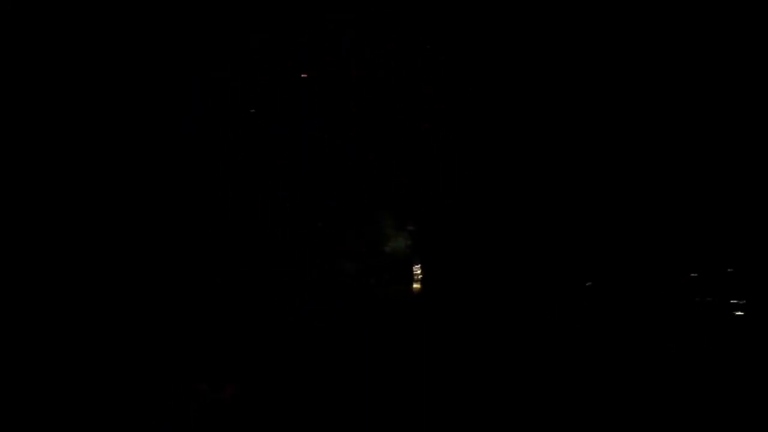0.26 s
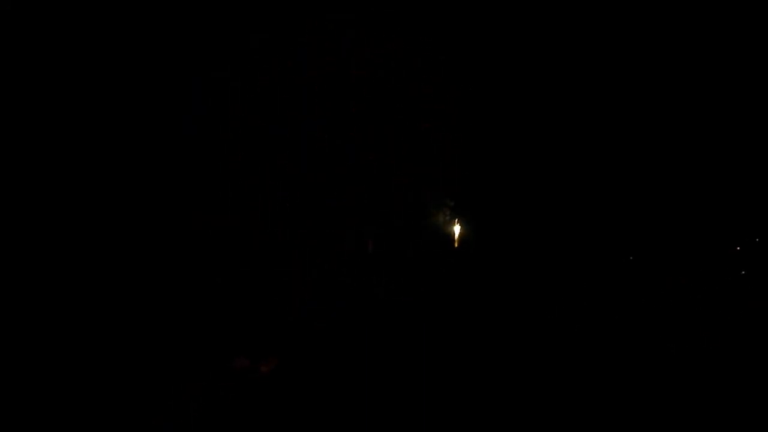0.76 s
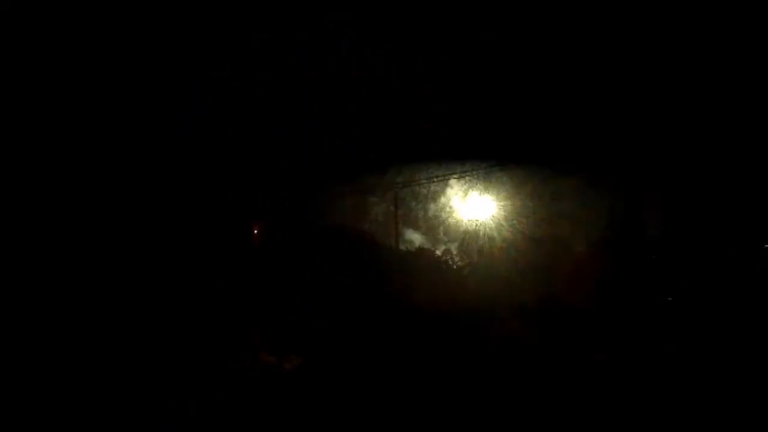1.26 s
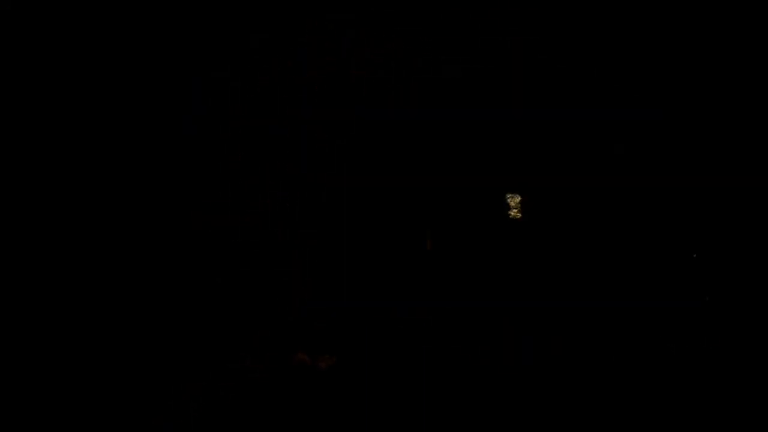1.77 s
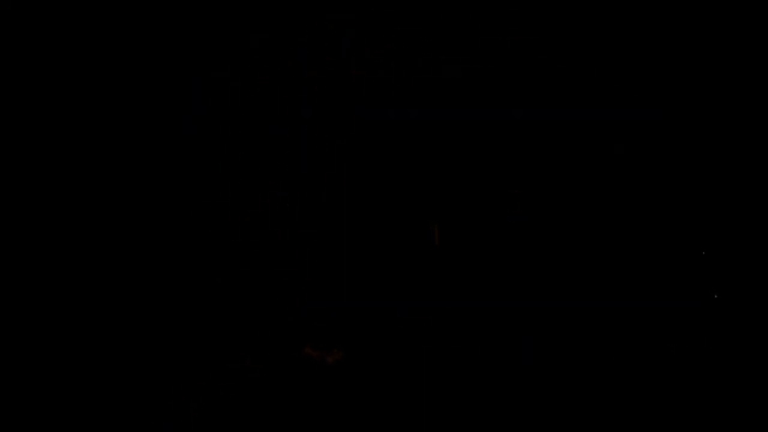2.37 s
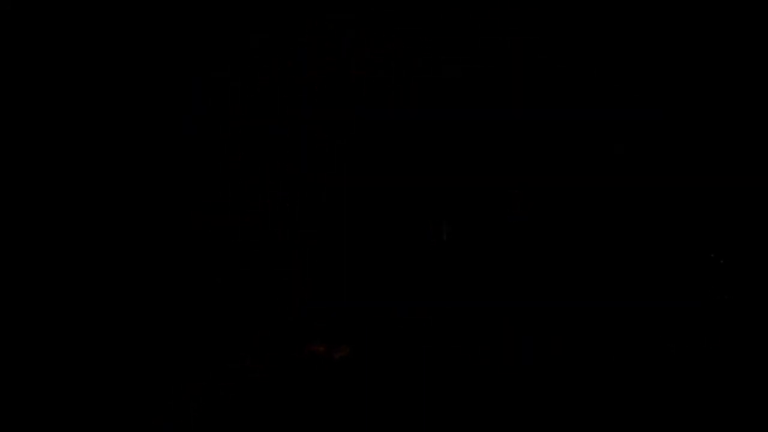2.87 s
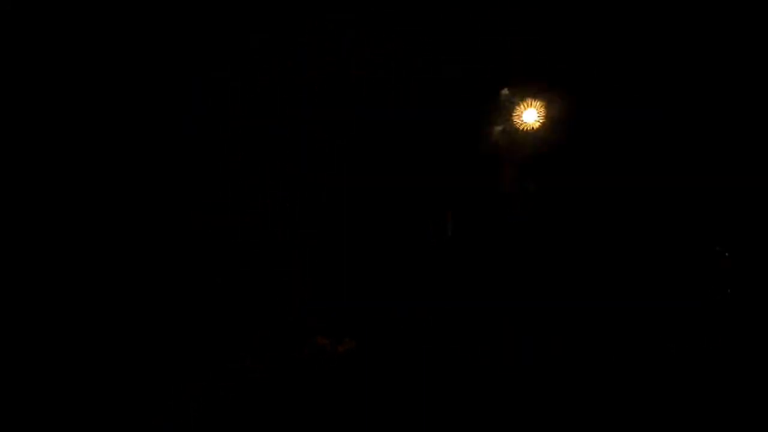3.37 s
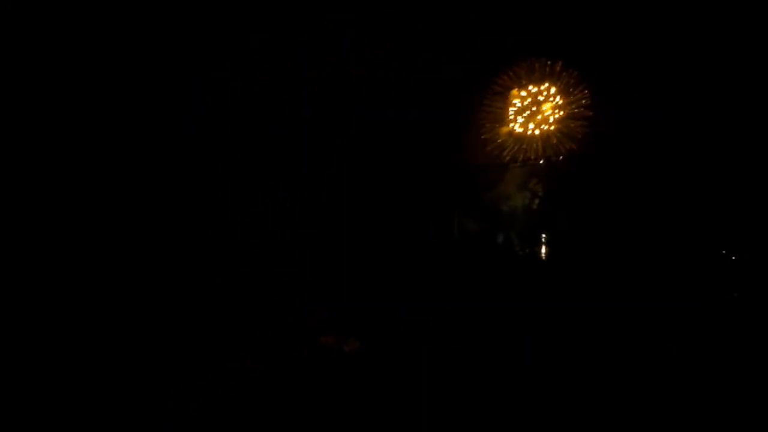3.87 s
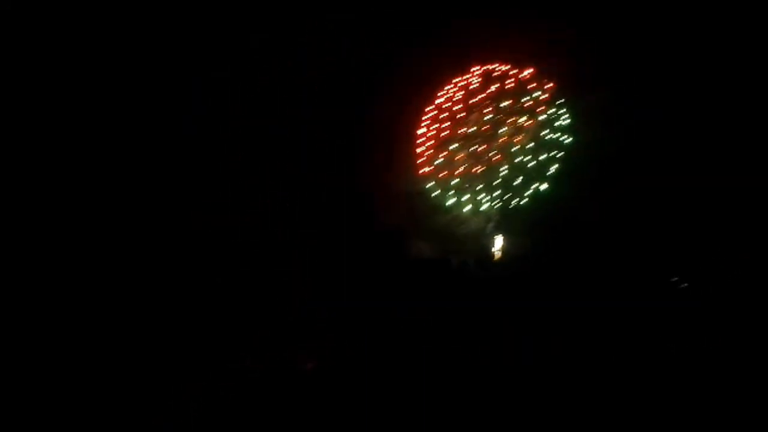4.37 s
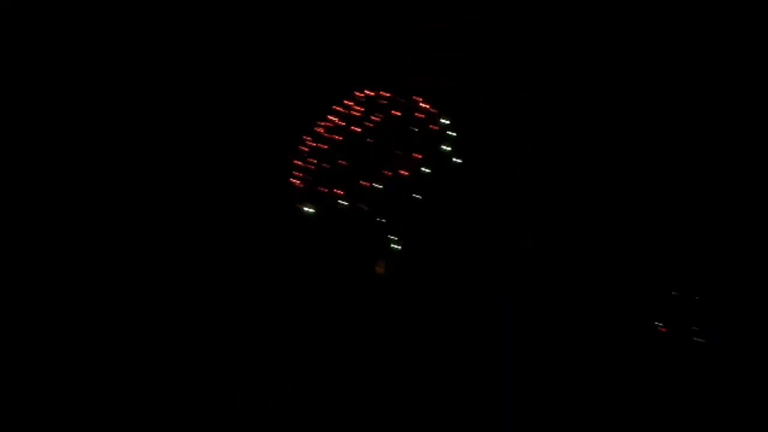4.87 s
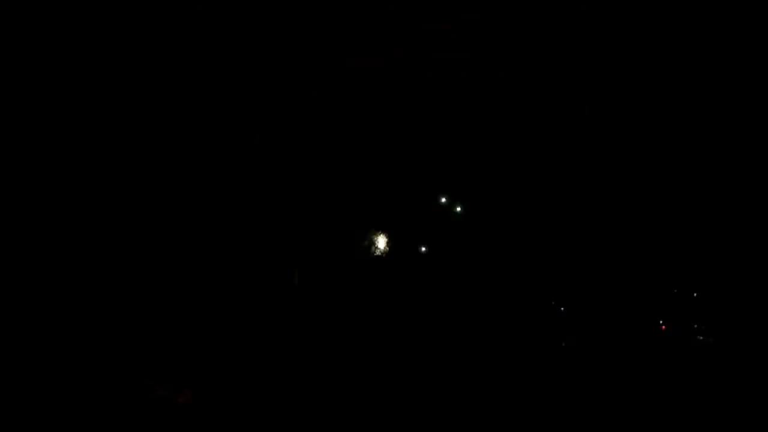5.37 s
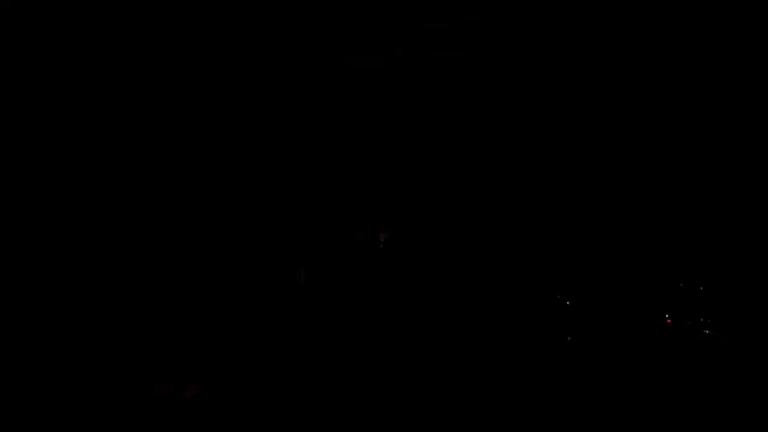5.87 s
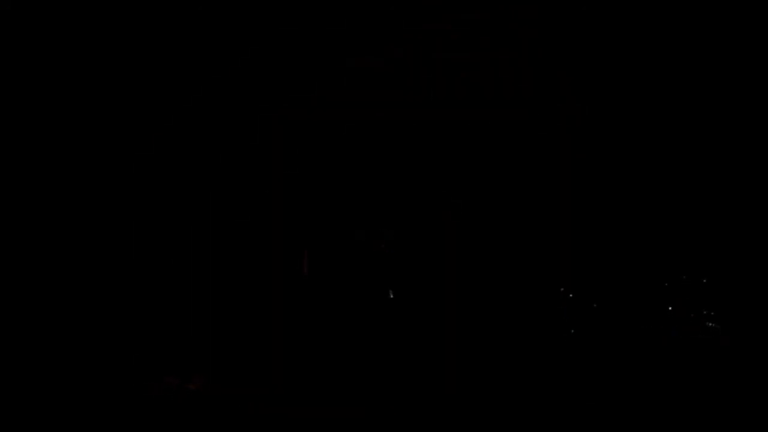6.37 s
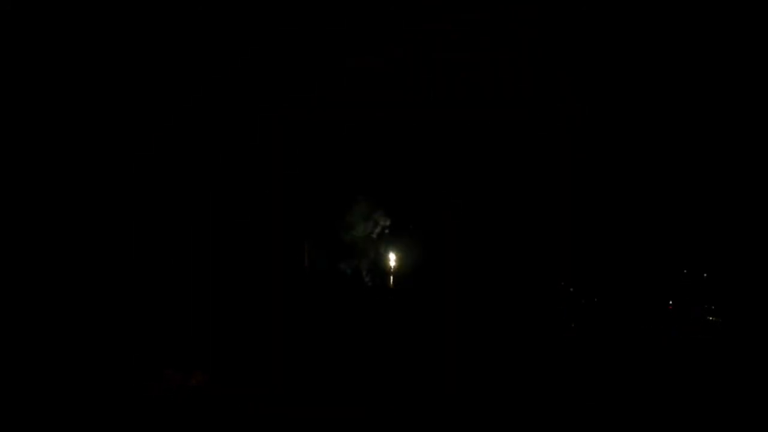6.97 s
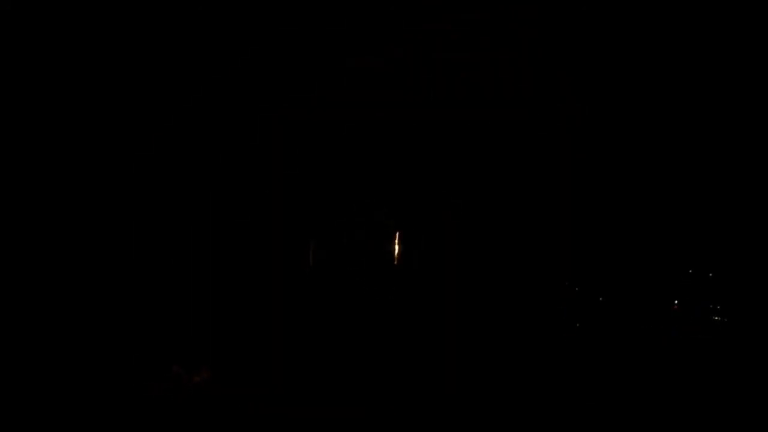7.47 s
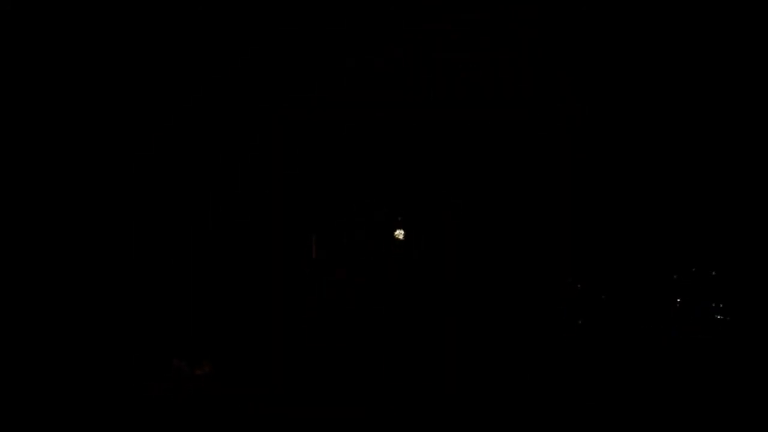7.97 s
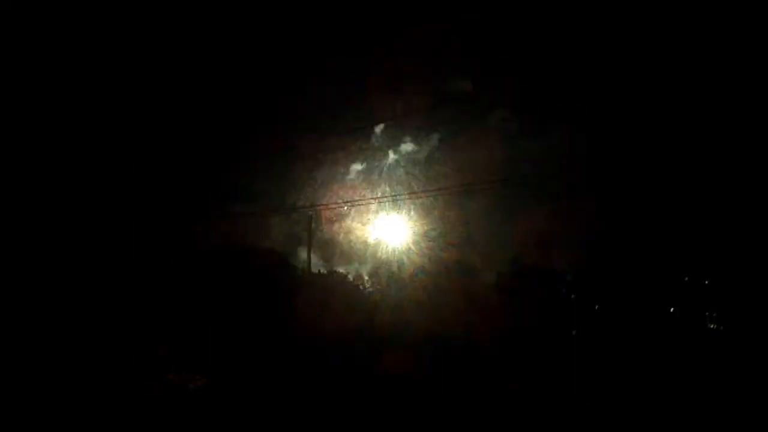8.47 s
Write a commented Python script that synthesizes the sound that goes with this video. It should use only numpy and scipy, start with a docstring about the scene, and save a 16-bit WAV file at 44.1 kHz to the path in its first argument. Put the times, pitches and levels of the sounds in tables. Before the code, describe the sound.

A faint roll of firework echoes hangs over a town at night, with very faint hiss at the microphone. At about 1.3 seconds one shell cracks sharply nearby, followed by a quick string of dull distant pops until about 2.1 seconds. From 3.1 to 3.6 seconds a rapid salvo of close bangs bursts, each with a brief fizz of sparks, slapping off walls and scattering through the streets. Another cluster of muffled far pops patters from 4.3 to 4.6 seconds under the rolling echo. A second close salvo runs from 6 to 6.7 seconds, with three small ticks right at the microphone between 6 and 6.4 seconds. One softer, duller thud follows at 7.2 seconds. The long low roll of echoes then fades across the town until the end, near 8.7 seconds.

```python
"""A faint roll of echoes hangs over a town at night, then a firework shell cracks close by. Near salvos
and dull far pops follow, each a pressure jump with a fizz of sparks, and each feeds the long roll.
Every blast reaches the microphone's two ports straight, off the ground and off nearby walls; the
streets scatter it further. Faint hiss and three small ticks sit right at the microphone.
The recorder subtracts each port, delayed, from the other to aim left and right."""
import sys
import numpy as np
from scipy import signal
from scipy.fft import rfft, irfft
from scipy.io import wavfile
from scipy.ndimage import uniform_filter1d

SR = 44100
rng = np.random.default_rng(int(sys.argv[2]) if len(sys.argv) > 2 else 0)


def wav_record(signal):
    """Record a signal, one row per channel, as 16-bit PCM in the file named by sys.argv[1]."""
    frames = np.transpose(np.atleast_2d(signal))
    bounded = np.clip(frames, -1, 1)
    # unit amplitude maps onto the largest positive 16-bit level
    quanta = np.round(bounded * 32767).astype(np.int16)
    wavfile.write(sys.argv[1], SR, quanta)


N = 384111

# Hiss around the microphone. Each row: time in seconds, level in dB.
HISS_DRIFT = [(0, -106), (1.4, -105.5), (2.9, -103.5), (3.7, -107.5), (5.2, -104.5), (5.95, -103.5),
              (6.8, -107.5), (8.71, -106.5)]
# Its colour. Each row: frequency in Hz, gain in dB.
HISS_SPECTRUM = [(500, 2.5), (3000, 5), (6000, -0.5), (8000, 3.5), (11000, 1.5), (13500, 3), (14900, -2),
                 (15300, -24), (17000, -33.5)]
# Ticks at the microphone. Each row: start in seconds, level in dB, pitch in Hz, knock gain in dB.
CLOSE_TICKS = [(6.001, -41, 9100, -8), (6.349, -40, 9100, -30), (6.37, -26, 9300, -29)]
# Echoes rolling back from far off. Each row: frequency in Hz, gain in dB.
ROLL_SPECTRUM = [(30, -46), (60, -40), (110, -4), (200, 1), (300, -3), (420, -13.5), (520, -12.5),
                 (640, -8), (800, -14.5), (1000, -19.5), (1400, -24), (2000, -25), (3000, -34),
                 (5000, -55.5), (9000, -63)]
# Their decay. Each row: frequency in Hz, seconds to fall 60 dB.
ROLL_DECAY = [(110, 5.4), (230, 5.3), (650, 6.5), (1200, 5.9), (2000, 5), (4000, 4)]
# The roll still in the air from an earlier salvo. Each row: frequency in Hz, level in dB.
OPENING_ROLL = [(110, -52), (200, -47), (650, -48), (2000, -47.3)]
# A quick and a slow swell of the roll, for near and for far shells. Each row: level in dB, dB gained
# per dB of shell level, build-up in seconds, decay time factor, treble and bass lift in dB per octave.
NEAR_SWELLS = [(-52.3, .3, .13, .39, .3, .8), (-49.3, 1, .45, 1, 1.3, .2)]
FAR_SWELLS = [(-32.5, 1, .015, .11, -2, 3), (-35, 1, 1.8, 1.7, 1.6, .2)]
# Sound scattered off the streets. Each row: frequency in Hz, gain in dB.
STREET_SPECTRUM = [(60, -8.5), (200, -4.5), (600, -13), (2000, -13.5), (5000, -11.5), (12000, -9.5)]
# Its decay. Each row: frequency in Hz, seconds to fall 60 dB.
STREET_DECAY = [(100, 1), (300, 0.48), (1000, 0.65), (3000, 0.6945), (8000, 0.69), (14000, 0.01)]
# Its treble comes mostly from further walls. Each row: frequency in Hz, build-up in seconds.
STREET_BUILD_UP = [(200, 0.013), (1000, 0.011), (3000, 0.027), (6000, 0.04), (10000, 0.07)]
# Treble flashes off the nearest rough walls. Each row: delay in seconds, strength, width in seconds.
WALL_FLASHES = [(0.011, 0.62, 0.0015), (0.0146, 3, 0.0022), (.0295, .9, .002)]
# Echo paths off the ground and off walls. Each row: delay in ms, gain in dB, signed factor,
# first port's lead in ms, extra loss at 10 kHz in dB.
GROUND_PATHS = [(1.5, -6.5, 0.73, 0.017, 43), (3.0, -7, 0.61, 0.017, 54.5), (5, -14.5, 1, 0.025, 31)]
WALL_PATHS = [(11.33, -10.5, -0.85, 0.022, 13), (14.89, -14.5, -0.91, -0.055, 5.4),
              (15.82, -21, 0.49, -0.077, 3), (28.58, -16, 0.94, -0.036, 11), (30.28, -13, -1.4, 0.12, 70),
              (30.85, -2, 0.94, 0.021, 310), (33.72, -3, -0.97, -.1, 390)]
# Distant shells. Each row: start in seconds, level in dB.
FAR_SHELLS = [(1.391, -47), (1.422, -38), (1.445, -40), (1.469, -37.5), (1.507, -37), (1.556, -37.5),
              (1.586, -39.5), (1.627, -47), (1.672, -34.5), (1.723, -36.5), (2.084, -43), (4.26, -39),
              (4.294, -37), (4.348, -39), (4.38, -36), (4.418, -36.5), (4.453, -38.5), (4.483, -47),
              (4.506, -37), (4.549, -35), (4.592, -37.5), (4.626, -39.5)]
# The blast they all share: the last five columns of NEAR_SHELLS.
FAR_SHAPE = (175, .3, -10, -56, -18)
# Shells close by. Each row: start in seconds, level in dB, air loss at 10 kHz in dB, jump length in ms,
# then gains in dB for ground bounce, spark fizz and low push.
NEAR_SHELLS = [(1.285, -7.5, 19, .49, -4.5, -23.5, -5), (3.08, -8.5, 25.5, .47, -5, -38, -11.5),
               (3.128, -13, 26, .88, 6, -30, -10), (3.298, -12.5, 18, .73, 10, -24.5, -7),
               (3.333, -13, 27, .54, 3, -30, -10), (3.37, -17.5, 23, .66, 6.5, -30, -7),
               (3.427, -16, 13, .56, 0, -23.5, -6.5), (3.473, -16.5, 29, .53, -.5, -34, -6),
               (3.551, -17.5, 20, .72, 2, -31, -4), (3.601, -16, 20.5, .69, 3, -27, -5),
               (6.043, -11, 33, .67, -2, -46, -12), (6.313, -12, 20.5, .78, 2, -26.5, -8.5),
               (6.404, -12.5, 13, .69, 1.5, -26, -6), (6.545, -11, 17, .66, -.5, -33, -12.5),
               (6.592, -9, 19, .69, 1.5, -19, -12.5), (6.623, -17.5, 15, .81, 4, -20, -9),
               (6.712, -17, 22, .73, 7, -32, -13.5), (6.738, -12, 16, .73, -3, -23.5, -8),
               (7.175, -27.5, 110, .48, 3, -60, -3)]
# How alike scattered sound is at the two ports. Each row: frequency in Hz, correlation.
PORT_LIKENESS = [(60, 1), (300, 0.99), (1000, 0.63), (2000, 0.1), (4000, .05)]
# The microphone's response to the bangs. Each row: frequency in Hz, gain in dB.
MIC_RESPONSE = [(30, -47), (70, -19.5), (140, 6.5), (250, 4.5), (400, -4), (520, 0.5), (650, 0), (900, -4),
                (1300, -6.5), (2500, 1.5), (4000, -4.5), (6000, -8.5), (8000, 4), (11000, 2), (16000, -15)]

RUSTLE_S, RUSTLE_DB, RUSTLE_RISE_S, RUSTLE_HOLD_S, RUSTLE_T60_S = .728, -95.5, .003, .03, .7
ROLL_PER_AIR_DB, ROLL_AIR_TOP_DB = .35, 35  # a more distant shell rolls more, up to this air loss
NEAR_WALL_DB, FAR_WALL_DB, WALL_PER_DB = -1.6, -7, -.17  # walls stand out more behind a weaker jump
STRAIGHT_LEAD_MS = .16  # direct sound meets the first port earlier
AIM_DELAY_SAMPLES, TOP_HZ = 15, 16700


def gain_of(db):
    """Decibels to amplitude."""
    return 10 ** (np.asarray(db) / 20)


def read(points, hz):
    """Value of a table on a log-frequency axis."""
    f, value = np.transpose(points)
    return np.interp(np.log(hz + 1), np.log(f + 1), value)


def causal(db):
    """Minimum-phase response for gains in dB from 0 Hz to half the sample rate."""
    log_gain = np.log(gain_of(np.maximum(db, -100)))
    return np.exp(np.conj(signal.hilbert(np.r_[log_gain, log_gain[-2:0:-1]])))[:len(db)]


def filtered(sound, order, hz, kind):
    """Butterworth filter."""
    return signal.lfilter(*signal.butter(order, hz, kind, fs=SR), sound)


def add(mix, s, sound):
    """Mixes a sound in at s seconds."""
    part = mix[round(s * SR):][:len(sound)]
    part += sound[:len(part)]


def port_noise(db, size, alike):
    """Noise at both ports from a bins x frames level field, with small drifting patches."""
    a, b, c, d, patches = rng.standard_normal((db.shape[1], db.shape[0], 5)).T
    patches = uniform_filter1d(uniform_filter1d(patches, 9, axis=0), 9, axis=1)
    first = a + 1j * b
    second = alike * first + np.sqrt(1 - alike ** 2) * (c + 1j * d)
    spectra = np.array([first, second]) * gain_of(db + 14 * patches)
    return signal.istft(spectra, nperseg=size, noverlap=size * 3 // 4)[1][:, :N]


def hiss():
    """Faint drifting hiss, unrelated at the two ports, that swells once in a brief rustle."""
    hz, t = np.fft.rfftfreq(1024, 1 / SR)[:, None], np.arange(N) / SR
    since = t - RUSTLE_S
    fall_db = 60 * np.maximum(since - RUSTLE_HOLD_S, 0) / RUSTLE_T60_S
    rustle = np.clip(since / RUSTLE_RISE_S, 0, 1) * gain_of(RUSTLE_DB - fall_db)
    drift = gain_of(np.interp(t, *np.transpose(HISS_DRIFT)))
    colour = read(HISS_SPECTRUM, hz) + np.zeros(N // 256 + 5)
    return np.hypot(drift, rustle) * port_noise(colour, 1024, alike=0)


def ticks():
    """Bright clicks close to the microphone, a dull knock under them, stronger at the first port."""
    t, out = np.arange(400) / SR, np.zeros(N)
    for s, db, hz, knock_db in CLOSE_TICKS:
        snap = rng.standard_normal(400) * np.exp(-t / 0.00083)
        click = signal.lfilter([1], [1, -1.1 * np.cos(2 * np.pi * hz / SR), .3], snap)
        knock = filtered(rng.standard_normal(400), 2, [950, 2100], "band")
        knock *= 55 * gain_of(knock_db) * t / .001 * np.exp(-t / 0.00085)
        add(out, s, gain_of(db - 7.5) * (click + knock))
    return out * np.array([[1], [.4]])


def roll(far_shells):
    """Echoes from far across town: every shell feeds swells that each band drains at its own speed."""
    hz, t = np.fft.rfftfreq(1024, 1 / SR)[:, None], np.arange(N // 256 + 5) * 256 / SR
    decay_db = 60 * t / read(ROLL_DECAY, hz)
    treble_octaves = np.log2(np.clip(hz, 900, 3000) / 900)
    bass_octaves = np.log2(450 / np.clip(hz, 180, 450))
    power = gain_of(read(OPENING_ROLL, hz) - decay_db) ** 2
    for shells, swells in (NEAR_SHELLS, NEAR_SWELLS), (far_shells, FAR_SWELLS):
        for roll_db, per_db, rise_s, stretch, treble_db, bass_db in swells:
            fed = np.zeros((1, len(t)))
            for s, level_db, air_db, *_ in shells:
                distance_db = ROLL_PER_AIR_DB * min(air_db, ROLL_AIR_TOP_DB)
                fed[0, round(s * SR / 256)] += gain_of(roll_db + per_db * level_db + distance_db) ** 2
            tilt_db = treble_db * treble_octaves + bass_db * bass_octaves
            swell = (1 - np.exp(-(t / rise_s) ** 2)) * gain_of(tilt_db - decay_db / stretch) ** 2
            power += abs(signal.fftconvolve(fed, swell, axes=1)[:, :len(t)])
    return port_noise(read(ROLL_SPECTRUM, hz) + 10 * np.log10(power), 1024, read(PORT_LIKENESS, hz))


def streets():
    """Impulse response of the streets around: dense echoes, each band building and dying at its pace."""
    hz, t = np.fft.rfftfreq(128, 1 / SR)[:, None], np.arange(1000) * 32 / SR
    flashes = sum(size * np.exp(-((t - s) / width) ** 2) for s, size, width in WALL_FLASHES)
    build_up = np.clip(t / read(STREET_BUILD_UP, hz), .01, 1)
    envelope = build_up + flashes * np.clip(hz / 4000 - .4, 0, 1)
    level_db = read(STREET_SPECTRUM, hz) + 20 * np.log10(envelope) - 60 * t / read(STREET_DECAY, hz)
    return gain_of(-49) * port_noise(level_db, 128, read(PORT_LIKENESS, hz))


def air(hz, loss_db):
    """Air takes more treble the longer the path; loss_db is the loss at 10 kHz."""
    return causal(-abs(loss_db) * (hz / 10000) ** 1.03)


def blasts(shells, wall_db):
    """Each shell is a pressure jump with fizzing sparks. Rows: bare, then each port with its echoes."""
    t, hz = np.arange(4096) / SR, np.fft.rfftfreq(4096, 1 / SR)
    bare, ports = np.zeros(N), np.zeros((2, N))
    delay_ms, path_db, factor, lead_ms, loss_db = np.transpose(GROUND_PATHS + WALL_PATHS)
    echoes = np.array([air(hz, loss) for loss in loss_db]) * (factor * gain_of(path_db))[:, None]
    phase_per_ms = -2j * np.pi * hz / 1000
    # every shell bursts at its own place, so echo delays and strengths differ a little
    scatter = rng.standard_normal((len(shells), 2, len(delay_ms)))
    for shell, (shift, swing) in zip(shells, scatter):
        s, level_db, air_db, length_ms, bounce_db, fizz_db, push_db = shell
        u = t * 1000 / length_ms
        jump = irfft(rfft((1 - u) * np.exp(-u)) * air(hz, air_db))
        sparks = filtered(rng.standard_normal(4096), 1, [5000, 11000], "band") * np.exp(-t / 0.0022)
        blast = gain_of(level_db + 7) * (jump / jump.max() + gain_of(fizz_db) * sparks)
        slow = t / 0.0017  # the swelling gas ball adds a longer, lower push
        blast += gain_of(level_db + push_db) * np.e * slow * (2 - slow) * np.exp(-slow)
        add(bare, s + .0016, blast)
        echo_db = [bounce_db] * len(GROUND_PATHS) + [wall_db + WALL_PER_DB * level_db] * len(WALL_PATHS)
        gains = gain_of(echo_db + 2.8 * swing)
        for port in (0, 1):
            arrival_ms = delay_ms * (1 + 0.0083 * shift) + port * lead_ms
            reflected = gains @ (echoes * np.exp(phase_per_ms * arrival_ms[:, None]))
            straight = np.exp(phase_per_ms * port * STRAIGHT_LEAD_MS)
            add(ports[port], s + 0.00181, irfft(rfft(blast) * (straight + reflected)))
    return np.vstack([bare, ports])


def scene():
    """The display as it is heard at the two ports, down among the streets."""
    far_shells = [row + FAR_SHAPE for row in FAR_SHELLS]
    # a grazing path over the ground cancels the low mids of far shells
    far = gain_of(5.8) * filtered(blasts(far_shells, FAR_WALL_DB), 2, 560, "high")
    salvos = blasts(NEAR_SHELLS, NEAR_WALL_DB) + far
    bare, ports = salvos[:1], salvos[1:]
    bangs = ports + signal.fftconvolve(bare, streets(), axes=1)[:, :N]
    capsule = irfft(causal(read(MIC_RESPONSE, np.fft.rfftfreq(4096, 1 / SR))))[None]
    return signal.oaconvolve(bangs, capsule, axes=1)[:, :N] + roll(far_shells) + hiss() + ticks()


def record(dry):
    """Each side is one port minus the other delayed; loud peaks round off and the top treble is cut."""
    ports = dry * gain_of([[0], [-2.2]])  # the second port is a little weaker
    opposite = np.pad(ports[::-1], ((0, 0), (AIM_DELAY_SAMPLES, 0)))[:, :N]
    aimed = ports - gain_of(0.32) * opposite
    rounded = 0.59 * np.tanh(aimed / .6)
    low_pass = signal.firwin(511, TOP_HZ, window=("kaiser", 9), fs=SR)
    return signal.oaconvolve(rounded, low_pass[None], "same")


dry = scene()
out = record(dry)
wav_record(out)
```